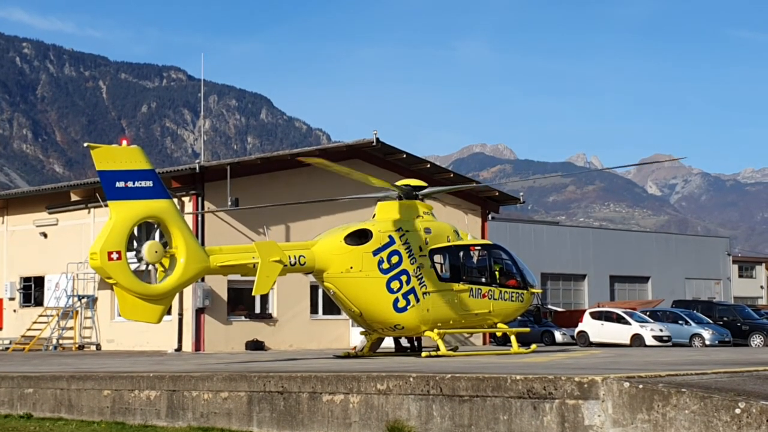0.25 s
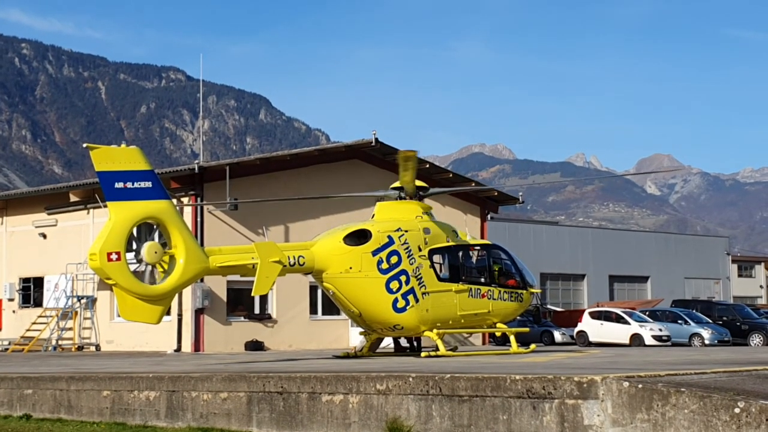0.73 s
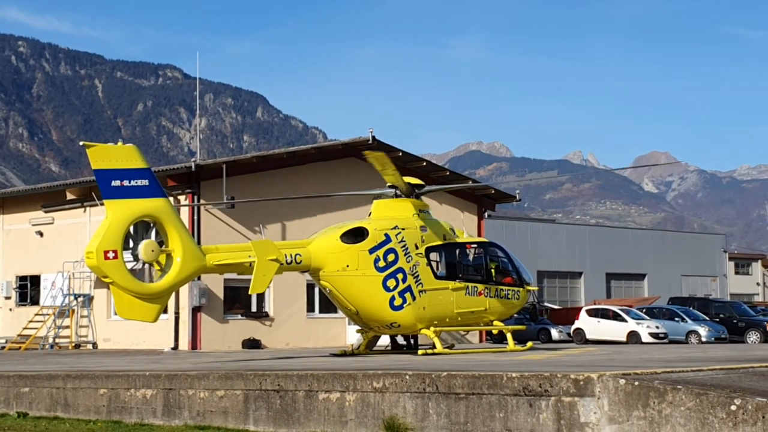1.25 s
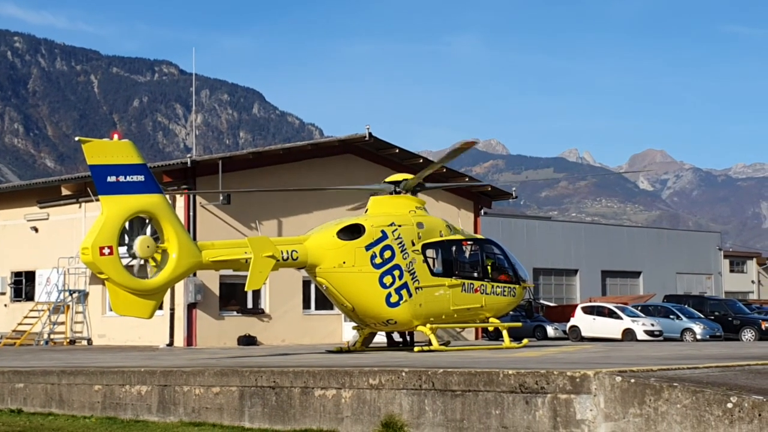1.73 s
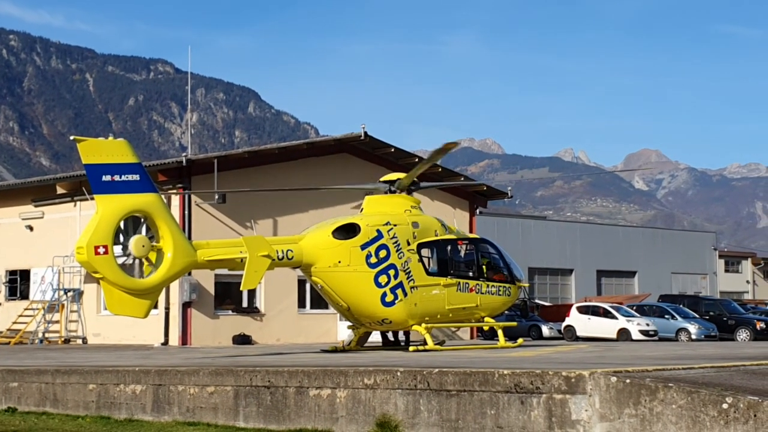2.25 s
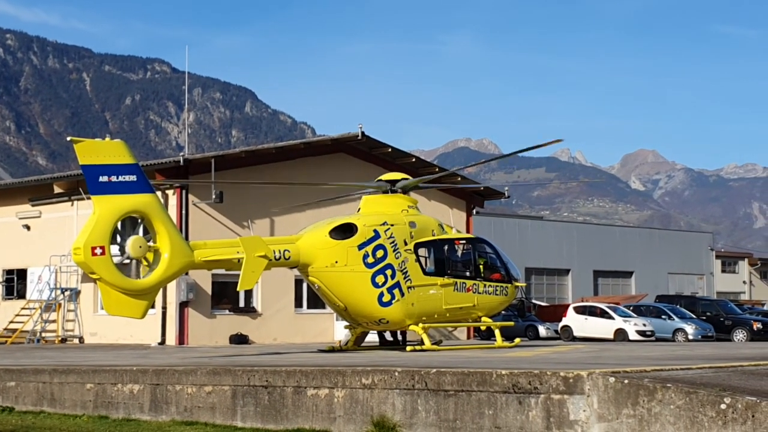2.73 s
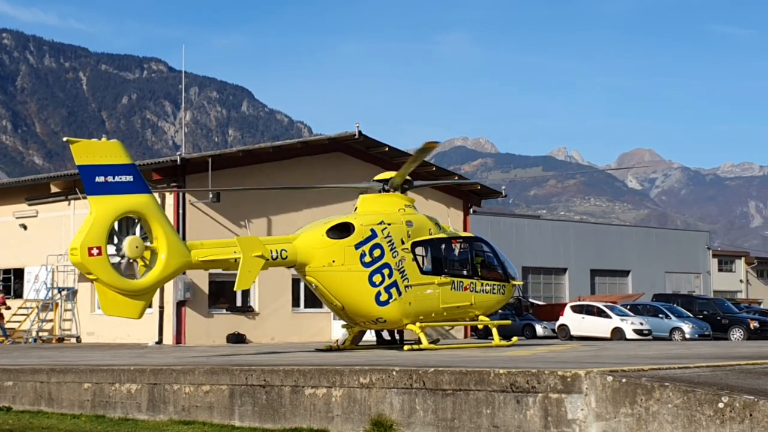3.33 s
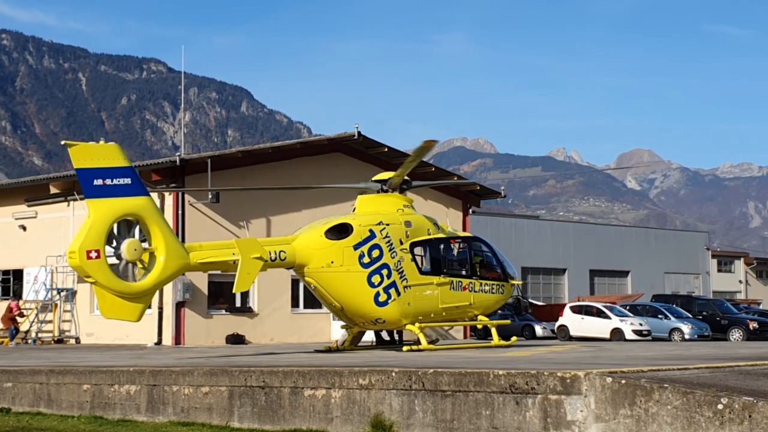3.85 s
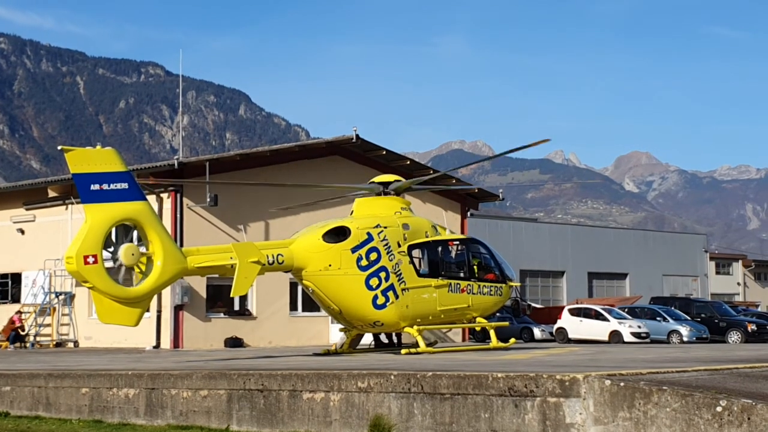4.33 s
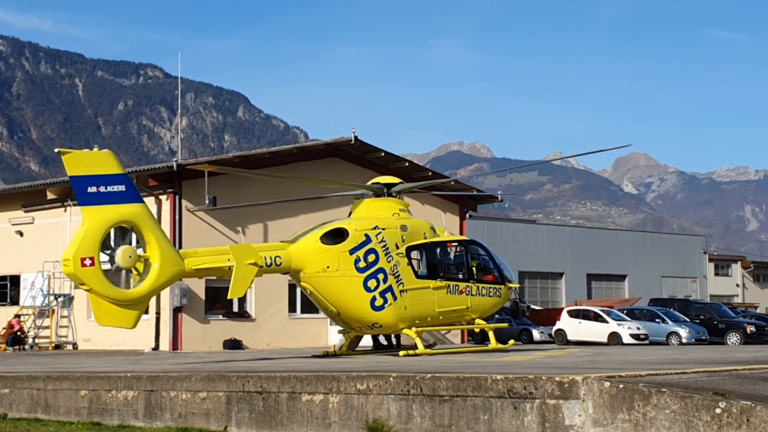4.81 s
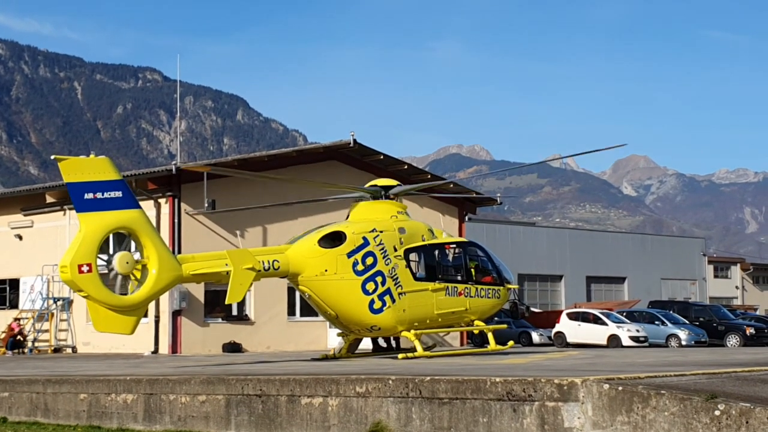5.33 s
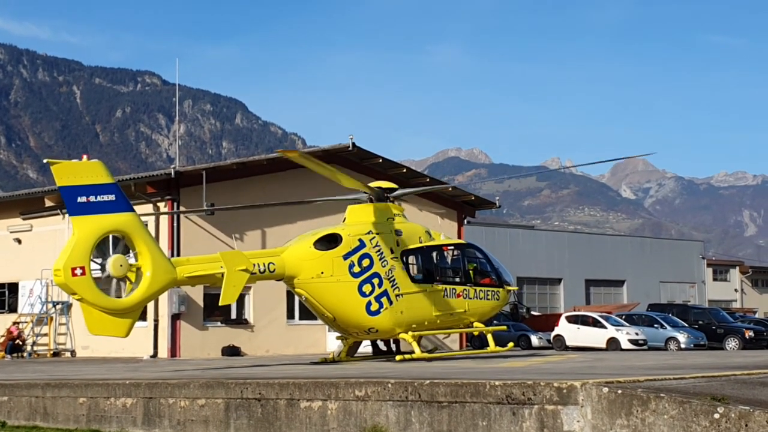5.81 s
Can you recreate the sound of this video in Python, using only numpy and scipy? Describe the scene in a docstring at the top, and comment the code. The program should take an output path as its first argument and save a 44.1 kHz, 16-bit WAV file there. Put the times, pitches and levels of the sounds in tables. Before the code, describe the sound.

A stereo microphone in gusty downwash hears a helicopter working low over a pad. Multi-toned fan hum and whine dominate early, then thin beneath breathy rushes of air and exhaust that come and go. A faint top hiss stays above. Wind rumble sits on the right throughout, with scattered soft thuds. Near the end the main blades slap in a fast, dull-to-crackly flutter and buffeting strengthens, reaching the left too.

```python
"""A helicopter's tail fan hums and whines, exhaust and rotor wash rush in swells, and in the last second
or so the main blades slap. Wind rumbles and thumps at the microphone, mostly on the right.
The light twin-turbine machine hovers low over a concrete pad, some way off. Its ducted fan sounds multiples
of the shaft speed; wash, duct and slaps are coloured noise shaped in level, under a faint top hiss and a very
faint narrow band of noise near 8.5 kHz. Downwash buffets the two microphone ports directly."""
import sys
import numpy as np
from scipy import signal
from scipy.fft import rfft, irfft, next_fast_len
from scipy.io import wavfile
from scipy.ndimage import uniform_filter1d, map_coordinates

SR = 44100
rng = np.random.default_rng(int(sys.argv[2]) if len(sys.argv) > 2 else 0)


def inscribe(sig):
    """Save sig as 16-bit PCM at rate SR to the path in sys.argv[1].

    A 1-D sig is mono; a 2-D sig holds one channel per row.
    Samples are clipped to [-1, 1] before scaling.
    """
    pcm = np.round(np.clip(np.atleast_2d(sig).T, -1, 1) * 32767)
    wavfile.write(sys.argv[1], SR, pcm.astype(np.int16))


N = 267687
BLADE_HZ = 26.2  # main blades passing per second

# How alike the two ports hear the helicopter. Each row: frequency in Hz, likeness from 0 to 1.
LIKENESS = [(200, 0.15), (480, 1), (800, 1), (1000, 0.15), (1400, 0.92), (3200, 1), (4200, 0.76),
            (5500, 0.78), (7000, .1)]


def amp(db):
    """Decibels to gain."""
    return 10 ** (np.asarray(db) / 20)


def unit(x):
    """Scale to rms 1."""
    return x / np.sqrt(np.mean(np.abs(x) ** 2) + 1e-20)


def along(points, hz):
    """Read (Hz, value) points on a log frequency axis."""
    f, v = np.transpose(points)
    return np.interp(np.log(hz + 1), np.log(f + 1), v)


def curves(rows):
    """One value per sample for each column after the time in seconds."""
    s, *cols = np.transpose(rows)
    return [np.interp(np.arange(N) / SR, s, c) for c in cols]


def wobble(rate):
    """A smooth random curve around 0 with rate knots a second."""
    coarse = np.arange(0, N + 64, 64)
    knots = rng.standard_normal(2048)
    smooth = map_coordinates(knots, [coarse * rate / SR], mode="wrap")
    return np.interp(np.arange(N), coarse, smooth)


def filtered(x, response):
    """Filter x with a complex response of frequency."""
    m = next_fast_len(N + SR // 4)
    return irfft(rfft(x, m) * response(np.fft.rfftfreq(m, 1 / SR)), m)[..., :N]


def noise(spectrum):
    """Coloured noise of rms 1."""
    return unit(filtered(rng.standard_normal(N), lambda hz: amp(along(spectrum, hz))))


def even(x, span):
    """Level a noise of rms 1 so that its strength stays nearly constant over every span seconds."""
    centre = np.atleast_2d(x).mean(axis=0)
    envelope = np.abs(signal.hilbert(centre, next_fast_len(N))[:N])
    power = uniform_filter1d(envelope ** 2 / 2, max(int(span * SR), 1))
    return x / np.sqrt(np.abs(power) + 0.04)


def patchy(x, depth_db, size_hz, life):
    """Random patches of the spectrum rise and fade, about size_hz wide and life seconds long."""
    z = signal.stft(x, nperseg=1024)[2]
    field = rng.standard_normal(z.shape[1:])
    # smooth the random field over frequency bins, then over time frames
    for axis, width in enumerate([size_hz * 1024 / SR, life * SR / 512]):
        bell = np.exp(-(np.arange(-16, 17) / width) ** 2)
        field = signal.fftconvolve(field, np.expand_dims(bell, 1 - axis), mode="same")
    return signal.istft(z * amp(depth_db * unit(field)), nperseg=1024)[1][:, :N]


def likeness(hz):
    """How alike the ports are at each frequency, kept short of identical."""
    return np.clip(along(LIKENESS, hz), 0, .99)


def ports(hz):
    """Complex gain of the left and right port, scaled so partly alike noise has power 1 in their mean."""
    # Level of the left port over the right. Each row: frequency in Hz, difference in dB.
    balance = [(100, 0), (300, 9), (500, 12), (700, 13), (850, 9), (1000, 2), (1200, 4.9), (1450, 2),
               (2000, 5), (2600, 6), (3500, 4), (4200, -2), (5000, -1), (6000, 4), (7000, 1.6)]
    # Phase by which the left port leads. Each row: frequency in Hz, lead in radians.
    lead = [(100, 1), (320, -2.5), (600, -0.8), (850, -3.5), (1100, -1.45), (1450, 0.5), (2100, 0.63),
            (3700, 0.62), (4400, 1.34), (6000, 3.5)]
    right = amp(-along(balance, hz)) * np.exp(-1j * along(lead, hz))
    centre = np.sqrt(1 + abs(right) ** 2 + 2 * likeness(hz) * right.real) / 2
    return np.array([np.ones_like(right), right]) / centre


def airborne(pair, spectrum):
    """Two unrelated signals become coloured stereo: the direct path plus scatter from pad and hangar."""
    def split(hz):
        turn = np.arccos(likeness(hz)) / 2
        return amp(along(spectrum, hz)) * [np.cos(turn), np.sin(turn)]

    direct, scatter = filtered(pair, split)
    return filtered(np.array([direct + scatter, direct - scatter]), ports)


def air(spectrum, patchy_db=0):
    """Stereo airflow noise from the helicopter, rms 1 in the centre."""
    pair = rng.standard_normal((2, N))
    if patchy_db:
        pair = patchy(pair, patchy_db, size_hz=62.6, life=0.043)
    x = airborne(pair, spectrum)
    return x / np.std(x.mean(axis=0))


def blade_beat(depth, lead):
    """Gain that swells once for each passing main blade."""
    return 1 + depth * np.cos(2 * np.pi * BLADE_HZ * np.arange(N) / SR + lead)


def orders(table, rough, flutter_rate):
    """Fan tones, rms 1 together; turbulent inflow shakes the strength and phase of each."""
    # Tail fan shaft speed. Each row: time in seconds, speed in turns per second.
    shaft = [(0, 118.6), (1.5, 118.5), (3, 118.9), (4.5, 119.15), (6.07, 118.8)]
    angle = 2 * np.pi * np.cumsum(curves(shaft)[0]) / SR
    out = np.zeros((2, N))
    for k, db in table:
        shake = 1 + rough * (wobble(flutter_rate) + 1j * wobble(flutter_rate))
        tone = amp(db) * shake * np.exp(1j * (k * angle + rng.uniform(0, 2 * np.pi)))
        out += (ports(k * shaft[0][1])[:, None] * tone).real
    return out / np.std(out.mean(axis=0))


def tail_fan(roar_db, rush_db):
    """Unevenly spaced fan blades sound many shaft orders, from hum to keen, over the rush of the duct."""
    # Fan loudness before trims. Each row: time in seconds, hum in dB, overtones in dB, duct airflow in dB.
    fan_levels = [(0, -49, -47.5, -56.5), (0.95, -51.5, -49, -57.5), (1.58, -48, -47, -55),
                  (1.95, -50, -53, -58.5), (2.45, -56.5, -57.5, -60), (2.85, -54, -55.5, -56),
                  (3.15, -55.5, -57.5, -59), (3.5, -52, -54, -57.5), (4.25, -55, -61, -59.5),
                  (5.05, -56.5, -59.5, -59), (5.55, -55, -72, -54.5), (6.05, -52, -61, -58)]
    # Whine against the exhaust roar. Each row: time in seconds, difference in dB.
    whine_share = [(0, -11), (0.35, -2), (0.8, 2), (1.02, -5), (1.6, -2.5), (2.1, -9), (2.85, -10.5),
                   (3.5, -5), (4.1, -10.5), (6.07, -9.5)]
    # Three groups of shaft orders, from low to high. Each row: multiple of shaft speed, relative level in dB.
    overtone_orders = [(5, 2), (6, -7), (7, -12), (8, -29)]
    whine_orders = [(9, -6), (10, -10), (12, 3)]
    keen_orders = [(14, -17), (16, 6.5), (18, -19), (19, 1), (20, -15), (21, 0.5), (22, 3), (23, -21),
                   (24, -0.5), (28, 4), (29, -21), (32, -5), (35, -3)]
    # Colour of the duct flow. Each row: frequency in Hz, relative level in dB per Hz.
    duct_colour = [(40, -28), (200, -31.5), (280, -12.5), (400, -8), (480, -2), (560, -1.5), (680, -4.5),
                   (800, -12), (950, -21), (1300, -15.5), (2500, -75)]

    def swing(db):
        return db - db.mean()

    hum_db, overtone_db, duct_db = curves(fan_levels)
    whine_db = roar_db + curves(whine_share)[0]
    # the keen follows the overtones and rides on the swells, in dB per dB
    keen_db = -59 + .35 * swing(overtone_db) + 1.73 * swing(rush_db)
    hum = amp(hum_db + 1.0) * orders([(4, 0)], rough=0.096, flutter_rate=35)
    overtones = amp(overtone_db + 0.8) * orders(overtone_orders, rough=0.42, flutter_rate=38)
    whine = amp(whine_db) * orders(whine_orders, rough=.45, flutter_rate=32)
    keen = amp(keen_db) * orders(keen_orders, rough=0.99, flutter_rate=28)
    duct = amp(duct_db + 6.0) * air(duct_colour) * blade_beat(depth=0.33, lead=2.66)
    return hum + overtones + whine + keen + duct


def swells(lull_roar_db=-57, lull_rush_db=-59.5, sharpness=1.53):
    """Roar and rush levels in dB: swells carried over by the air add their power to the lull."""
    # Each row: centre in seconds, half length in seconds, roar in dB, rush in dB, both before trims.
    swell_rows = [(0.11, 0.19, -52, -47), (0.337, 0.061, -49.5, -48), (0.576, 0.098, -49, -47),
                  (0.902, 0.047, -44.5, -47.5), (1.137, 0.072, -47.5, -46.5), (1.52, 0.12, -57, -54),
                  (1.78, 0.081, -49, -52), (2.073, .03, -69, -54.5), (2.658, 0.038, -49.5, -48.5),
                  (2.853, 0.062, -43, -43.5), (3.497, 0.084, -46.5, -47), (3.948, 0.13, -59, -49),
                  (4.185, 0.036, -50, -47), (4.48, .09, -51, -46), (4.659, 0.017, -47.5, -52),
                  (4.88, 0.056, -59, -55), (5.215, 0.11, -56.5, -53), (5.482, 0.044, -51, -47.5),
                  (5.71, 0.08, -50.5, -50), (6.05, 0.11, -52.5, -57)]
    t = np.arange(0, N / SR + .01, .005)
    power = amp([[lull_roar_db], [lull_rush_db]]) ** 2
    for s, half, roar_db, rush_db in swell_rows:
        # sharpness 2 is a bell, 1 a cusp
        shape = np.exp(-np.abs((t - s) / half) ** sharpness / 2)
        power = power + amp([[roar_db], [rush_db]]) ** 2 * shape
    return curves(np.column_stack([t, *10 * np.log10(power)]))


def wash(roar_db, rush_db):
    """Exhaust roar and rotor rush swell as the hot air drifts, and flutter with the blades."""
    # Colours of exhaust and rotor wash. Each row: frequency in Hz, relative level in dB per Hz.
    roar_colour = [(300, -53), (700, -12), (950, -14.5), (1150, -0.5), (1500, 5), (1900, 5), (2200, -1),
                   (3000, -4), (6000, -61)]
    rush_colour = [(1200, -42), (2000, -11.5), (2450, 2), (3000, 0), (3500, 3), (4200, -2), (5000, -14.5),
                   (6000, -28.5), (6800, -24.5), (7500, -53), (9000, -58)]
    flutter = amp(1.13 * wobble(26)) * blade_beat(depth=0.14, lead=2.43)
    roar = amp(roar_db - 1.5) * even(air(roar_colour, patchy_db=2.0), span=0.08)
    rush = amp(rush_db - 1.46) * even(air(rush_colour, patchy_db=3.0), span=0.13)
    return flutter * (roar + rush)


def blade_slaps(first=4.7483, delay=0.0016, width=0.00083, echo_db=-19, echo_t60=0.028,
                body_db=-9.0, crack_db=-6.0, scatter_db=.8, bright_scatter_db=1.5):
    """Each blade cuts the tip vortex of the one before: a short thwack and crack, and scatter off the pad."""
    # How hard the blades bite into their wake. Each row: time in seconds, slap in dB, brightness in dB,
    # both before trim and scatter.
    bite = [(4.75, -36.5, -9), (4.86, -44, -13), (5.0, -36.5, -14), (5.16, -33.5, 1), (5.22, -36.5, -1),
            (5.29, -26, -14), (5.42, -27, -19), (5.56, -32.5, -6), (5.68, -29.5, -6), (5.86, -32, -17)]
    # Colours of the dull body and the bright crack. Each row: frequency in Hz, relative level in dB per Hz.
    thwack_colour = [(150, -23), (500, 6), (900, -1.5), (1600, 13), (2500, -2), (3400, -0.5), (4600, -19),
                     (8000, -65)]
    crack_colour = [(1200, -40), (2200, -4), (3100, -1), (4300, -6), (5200, -22), (6800, -30), (8000, -56)]
    t = np.arange(SR // 30) / SR
    pulse = np.exp(-((t - delay) / width) ** 2 / 2)
    echo = amp(echo_db - 60 * t / echo_t60) * (t > delay)
    shape = pulse + echo
    bite_db, bright_db = curves(bite)
    passes = np.round(np.arange(first, bite[-1][0], 1 / BLADE_HZ) * SR).astype(int)
    strength = np.zeros((2, N + SR))
    for i, (hard, sharp) in zip(passes, rng.standard_normal((len(passes), 2))):
        parts_db = np.array([[body_db], [crack_db + bright_db[i] + bright_scatter_db * sharp]])
        strength[:, i:i + len(t)] += amp(bite_db[i] + scatter_db * hard + parts_db) * shape
    thwack = strength[0, :N] * even(air(thwack_colour), span=0.0015)
    crack = strength[1, :N] * even(air(crack_colour), span=0.0022)
    return thwack + crack


def narrow_hiss(centre_hz=8550, left_db=3, right_db=-15):
    """A very faint narrow band of noise near 8.5 kHz, mostly on the left."""
    # Each row: time in seconds, level in dB before the left and right trims.
    hiss_levels = [(0, -78), (4.4, -108), (4.6, -78), (5.05, -76), (5.65, -81), (6.07, -93)]
    band = [(centre_hz * 0.82, -40), (centre_hz, 0), (centre_hz * 1.07, -40)]
    fuzz = noise([(6000, -100), *band, (11000, -100)])
    return amp(curves(hiss_levels)[0]) * amp([[left_db], [right_db]]) * fuzz


def sizzle(rush_db):
    """A faint, nearly steady top hiss that pulses with the blades: unrelated noise left and right."""
    # Colour of the hiss. Each row: frequency in Hz, relative level in dB per Hz.
    hiss_colour = [(3500, -9), (4800, -1.5), (6000, -3), (6800, -11), (7500, -30.5), (8300, -9.5),
                   (9000, -11.5), (10200, 1.5), (11000, 0.5), (12500, -4), (14300, 2), (15800, -6)]
    # Level of the left port over the right. Each row: frequency in Hz, difference in dB.
    hiss_balance = [(7000, 5), (8000, 14), (10300, 27), (12000, 17), (12900, 17), (13600, 4.5), (15500, 1)]
    pair = np.array([noise(hiss_colour), noise(hiss_colour)])
    pair = filtered(pair, lambda hz: np.array([np.ones_like(hz), amp(-along(hiss_balance, hz))]))
    level_db = -57.5 + 0.2 * (rush_db - rush_db.mean()) + 0.7 * wobble(55)
    return amp(level_db) * blade_beat(depth=0.074, lead=1.5) * pair


def gusts(rise=0.046, fall=0.05, calm_db=-56.5, lump_db=3, lump_rate=18):
    """Wind level in dB: each gust rises, holds and falls away (times in seconds), lumpy throughout."""
    # Downwash on the windward right port. Each row: start in seconds, length in seconds, level in dB
    # before lumps and trims.
    gust_rows = [(0.066, 0.98, -43), (1.026, .39, -42), (1.445, 0.61, -50.5), (2.632, 0.43, -45.5),
                 (3.21, 0.2, -48), (3.757, .17, -40), (4.2, 0.2, -50), (4.585, 0.45, -41.5),
                 (5.357, .17, -37.5), (5.656, 0.11, -33), (5.8, .15, -40.5)]
    t = np.arange(N) / SR
    wind = amp(calm_db)
    for s, length, db in gust_rows:
        outside = np.maximum((s - t) / rise, (t - s - length) / fall)
        wind = np.maximum(wind, amp(db) * np.exp(-np.clip(outside, 0, 20)))
    return 20 * np.log10(wind) + lump_db * wobble(lump_rate)


def turbulence(spectrum, span):
    """Pressure swings at a port, nearly even in strength over span seconds, less the slowest ones."""
    return filtered(even(noise(spectrum), span), lambda hz: hz / np.hypot(hz, 25))


def downwash(width=0.012, steady_db=5.0, left_db=0.0, right_db=-0.5, most_db=-37, whirl_db=-40,
             whirl_growth=1.86):
    """Wind rumbles on the right port all along; only strong eddies thump the sheltered left one."""
    # Eddies that thump the ports. Each row: time in seconds, left in dB, right in dB, both before trims.
    eddies = [(0.12, -75, -37), (0.264, -47, -33.5), (0.37, -85, -33), (0.709, -39, -23),
              (0.804, -38, -23.5), (1.067, -40, -24.5), (1.11, -47, -28), (1.22, -74, -36),
              (1.325, -66, -32), (1.4, -75, -36), (2.109, -75, -37), (2.662, -45, -30.5), (3.33, -63, -38),
              (3.747, -58, -29), (3.801, -40, -35.5), (3.861, -36, -26), (3.99, -70, -35),
              (4.078, -35, -26.5), (4.921, -52, -33), (5.017, -51, -29.5), (5.381, -31, -30),
              (5.428, -32, -24), (5.509, -26, -24.5), (5.666, -26, -26), (5.712, -23, -27),
              (5.771, -30, -39), (5.858, -37, -35), (5.924, -31.5, -32)]
    # Colours of an eddy, the steady stream and the small whirls of a strong gust.
    # Each row: frequency in Hz, relative level in dB per Hz.
    eddy_colour = [(10, -35), (25, 10.5), (55, -3.5), (100, 13), (150, -8.5), (220, -11), (350, -13.5),
                   (600, -37), (1200, -56), (3000, -90)]
    stream_colour = [(10, -17), (25, -10), (50, 4.5), (85, -1), (115, -4), (150, -15), (200, -19.5),
                     (300, -34), (600, -36), (2000, -97)]
    whirl_colour = [(50, -16), (100, 5), (140, 2.5), (190, -7.5), (300, -11.5), (420, -14.5), (700, -30),
                    (1300, -47), (3000, -90)]
    t = np.arange(N) / SR
    puffs = np.zeros((2, N))
    for s, left, right in eddies:
        puffs += amp([[left + left_db], [right + right_db]]) * np.exp(-((t - s) / width) ** 2 / 2)
    out = puffs * np.array([turbulence(eddy_colour, span=0.0074), turbulence(eddy_colour, span=0.021)])
    # the steady stream stops growing once the wind reaches most_db
    wind_db = gusts()
    out[1] += amp(np.minimum(wind_db, most_db) + steady_db) * turbulence(stream_colour, span=0.058)
    # small whirls grow faster than the stream, so a long, strong gust sounds brighter
    gust_db = uniform_filter1d(wind_db, round(SR * .12))
    out[1] += amp(whirl_db + whirl_growth * (gust_db - most_db)) * turbulence(whirl_colour, span=0.092)
    return out


def scene():
    """The helicopter and its wind; the same swells carry wash, high fan tones and hiss."""
    roar_db, rush_db = swells()
    helicopter = tail_fan(roar_db, rush_db) + wash(roar_db, rush_db) + blade_slaps()
    return helicopter + narrow_hiss() + sizzle(rush_db) + downwash()


def record(dry, top_hz=15780):
    """A sharp band limit keeps nothing above top_hz."""
    return filtered(dry, lambda hz: hz < top_hz)


dry = scene()
out = record(dry)
inscribe(out)
```